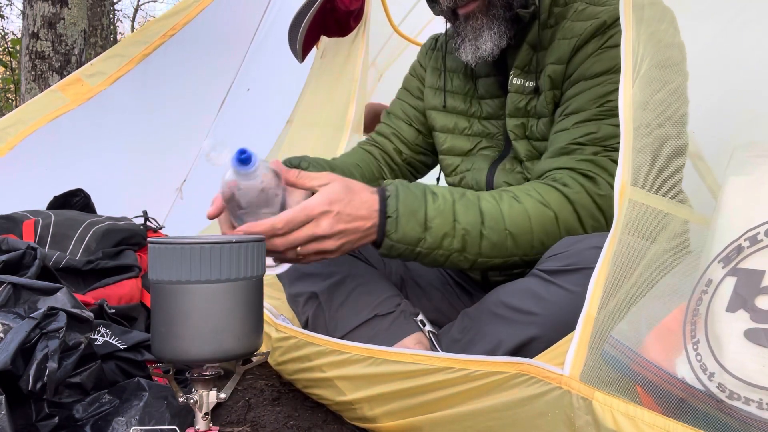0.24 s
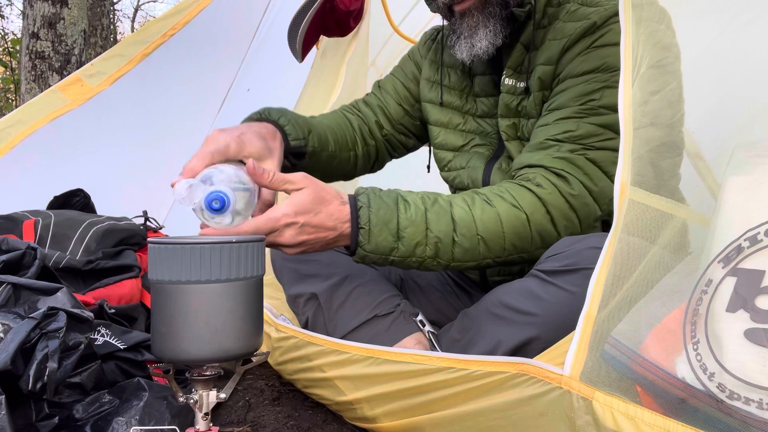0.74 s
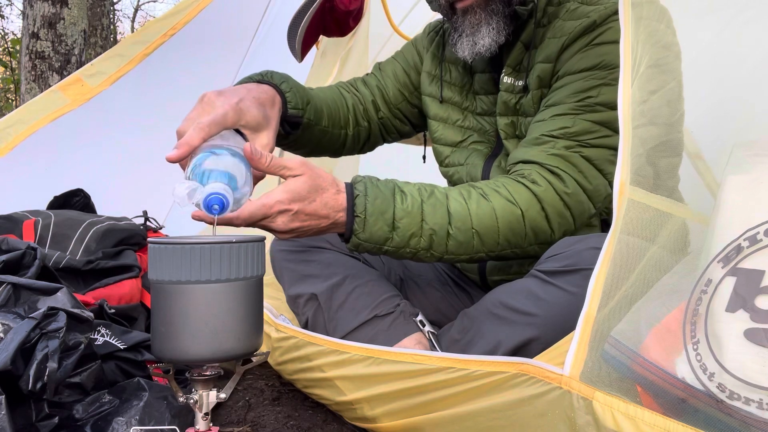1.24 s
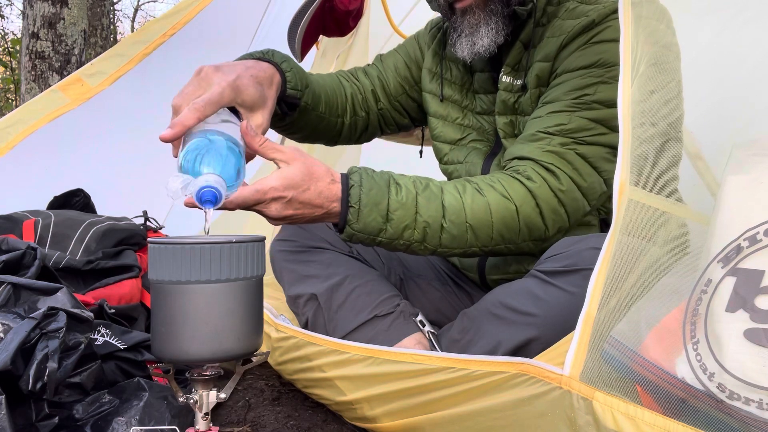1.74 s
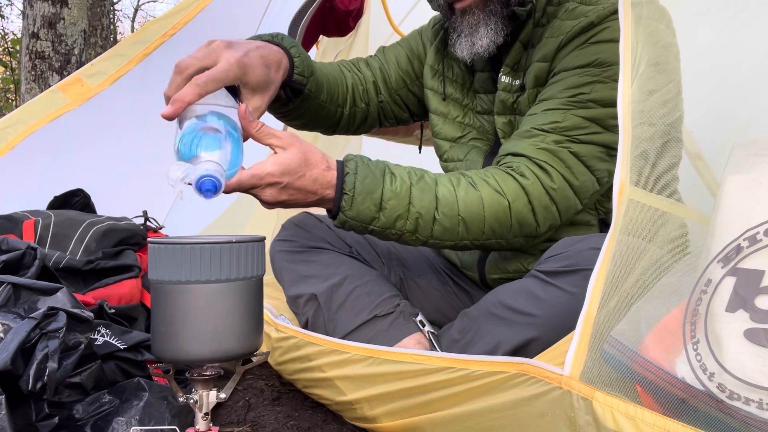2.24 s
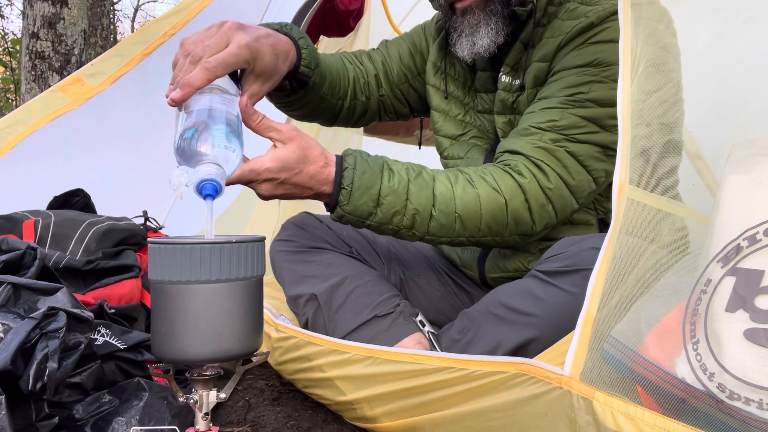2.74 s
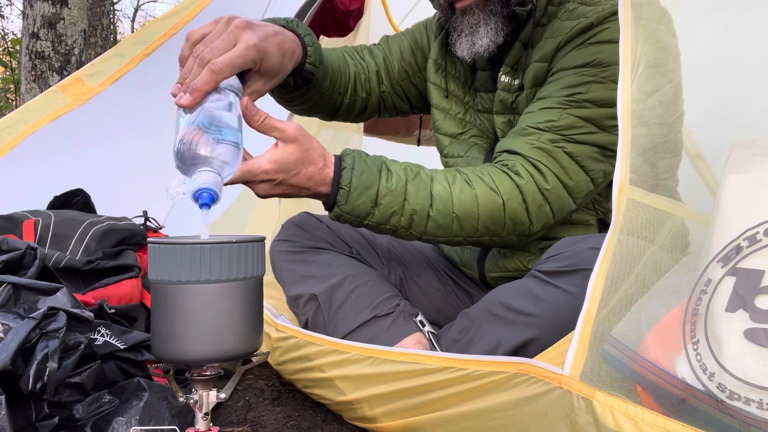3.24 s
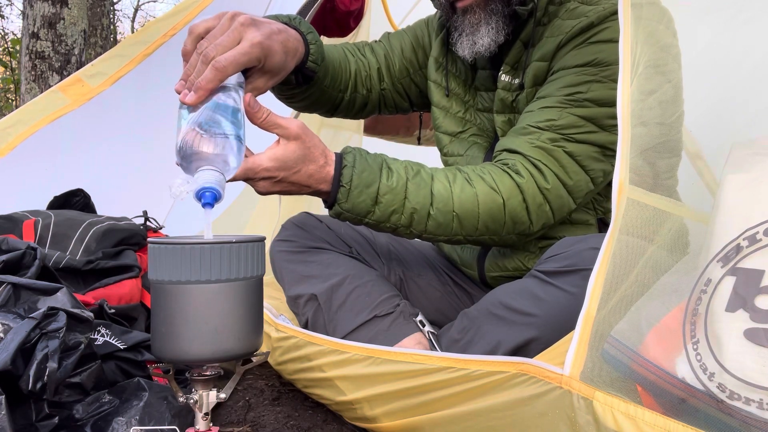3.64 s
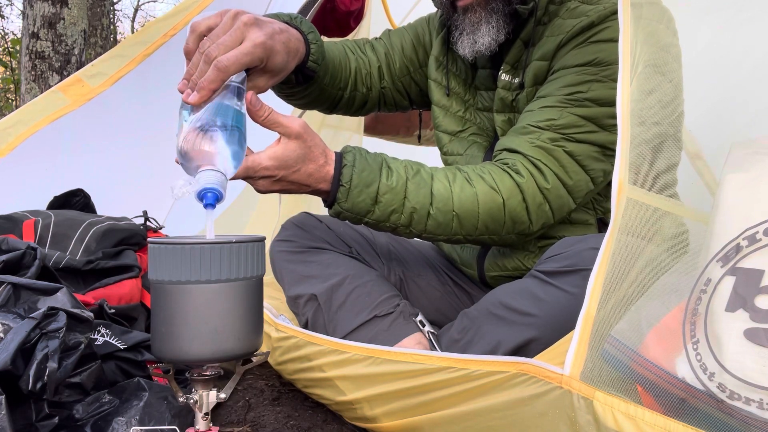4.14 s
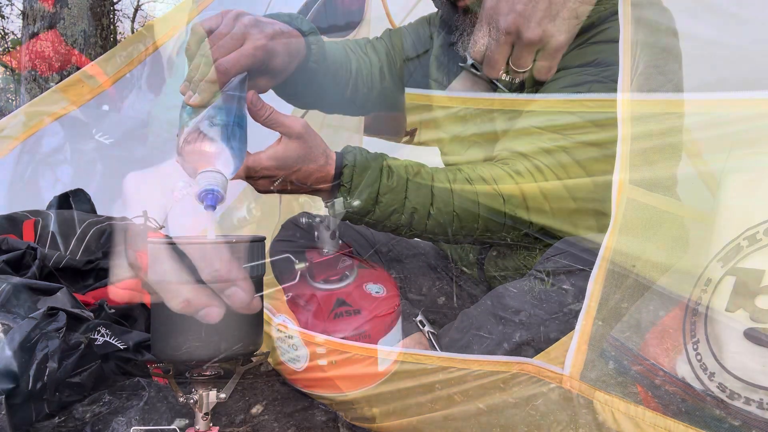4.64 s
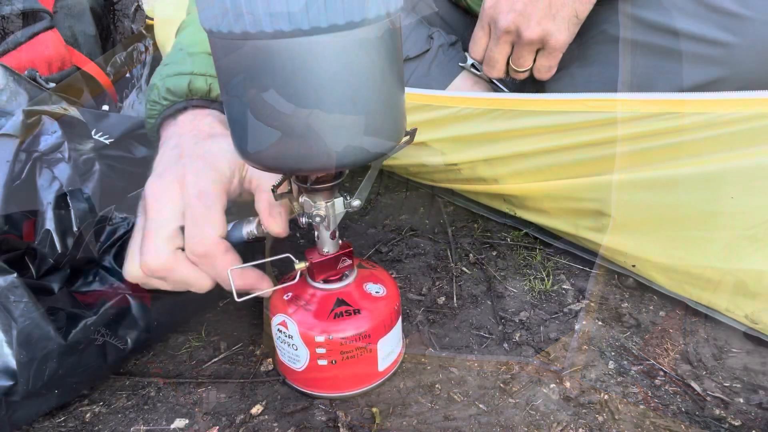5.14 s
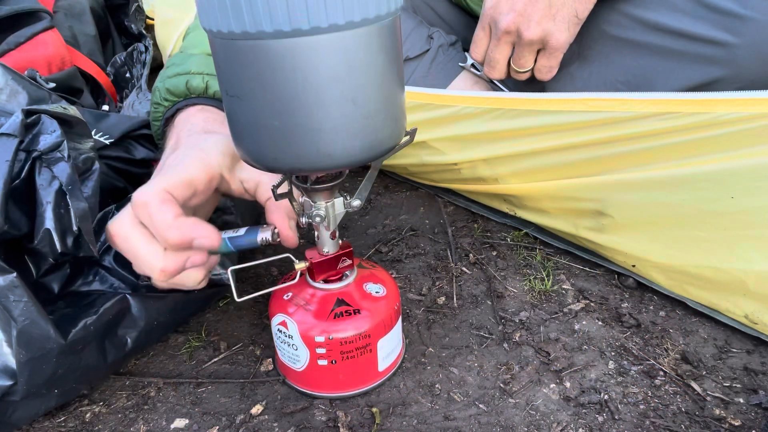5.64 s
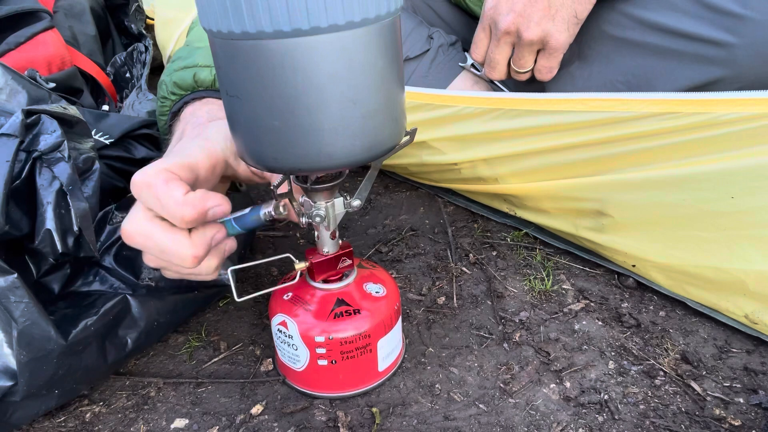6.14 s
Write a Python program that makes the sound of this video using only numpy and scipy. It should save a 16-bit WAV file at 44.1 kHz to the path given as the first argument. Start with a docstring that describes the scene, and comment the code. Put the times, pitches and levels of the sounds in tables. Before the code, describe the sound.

Water drips, glugs and then streams from a plastic bottle into an empty thin metal pot, pinging at first, splashier and fuller as it fills. Birds whistle with woodland echo behind a quiet outdoor hush. Pouring crossfades into the steady hiss of an opened gas stove, soft bumps of hands, and a single crisp lighter click without ignition. Close, natural stereo microphone.

```python
"""Water is poured from a plastic bottle into a thin metal pot, in an open tent in a wood.
Single drops ring wall and floor modes, the floor's sinking in pitch under the water; then a stream
splashes and gurgles, built from swarms of ringing bubbles, single large bubbles and noise slaps.
Pouring fades into the filtered-noise hiss of an opening gas stove; a lighter clicks once.
Behind are buzzed and slurred bird whistles with wood echo, sleeve rustle, knocks and outdoor hush."""
import sys
import numpy as np
from scipy import signal
from scipy.fft import rfft, irfft, next_fast_len
from scipy.io import wavfile
from scipy.ndimage import uniform_filter1d

SR = 44100
rng = np.random.default_rng(int(sys.argv[2]) if len(sys.argv) > 2 else 0)


def waveform_to_disk(signal):
    """Save audio, clipped to [-1, 1], as 16-bit WAV at the path in sys.argv[1]."""
    frames = np.transpose(np.atleast_2d(signal))
    scaled = np.clip(frames, -1, 1) * 32767
    samples = np.round(scaled).astype(np.int16)
    wavfile.write(sys.argv[1], SR, samples)


N = 281358
T = np.arange(N) / SR

# main mode of the pot floor, sinking under the water: [time_s, pitch_hz]
POT_PITCH = [(.9, 1173), (1.03, 1133), (1.5, 1086), (1.8, 1089), (1.97, 1125), (2.34, 1051), (2.42, 988),
             (2.86, 1049), (2.99, 1004), (3.17, 852), (3.48, 760), (3.65, 740), (3.9, 710), (4.2, 606),
             (4.9, 590)]
# strength of the stream, as the level of its splashing: [time_s, level_db]
FLOW = [(2.68, -95), (2.74, -68.5), (2.89, -54), (2.98, -51), (3.07, -55.5), (3.16, -48), (3.29, -52.5),
        (3.38, -50), (3.66, -47), (3.78, -47), (3.83, -49), (4.1, -45.5), (4.33, -47.5), (4.65, -46.5),
        (4.88, -48.5), (5.15, -60.5)]
# resonances of the air in the pot: [pitch_hz, width_hz, level_db]
CAVITY = [(453.5, 15, 5), (710, 90, -12), (1580, 110, -6.5), (2220, 140, 5.5), (2960, 300, 1),
          (6450, 250, 4), (8500, 620, -5.5)]
# the catch slips, then the hammer strikes: [start_s, relative_db, t60_s]
LIGHTER = [(5.682, -13, 0.014), (5.6832, -3, .0065)]
MAIN_HZ = 1083  # reference pitch of the main floor mode


def amp(db):
    """Decibels to gain."""
    return 10 ** (np.asarray(db) / 20)


def evened(x):
    """Scales to rms 1."""
    return x / np.sqrt(np.mean(x ** 2) + 1e-20)


def curve(rows, at, axis=1):
    """One column of a table, joined by straight lines."""
    rows = np.array(rows, float)
    return np.interp(at, rows[:, 0], rows[:, axis])


def colour(x, spectrum, modes=()):
    """Filters by a short spectrum on a log axis, with resonances standing out of it."""
    size = next_fast_len(len(x) + 2048)
    hz = np.fft.rfftfreq(size, 1 / SR)
    f, db = np.transpose(spectrum)
    peaks = 1 + sum(amp(g) / (1 + 2j * (hz - at) / width) for at, width, g in modes)
    gain = amp(np.interp(np.log(hz + 1), np.log(f), db))
    return irfft(rfft(x, size) * peaks * gain, size)[:len(x)]


def add(mix, s, sound):
    """Adds a sound at a time in seconds."""
    part = mix[max(round(s * SR), 0):][:len(sound)]
    part += sound[:len(part)]


def dying(t60, attack=.0004):
    """A quick rise and an exponential decay."""
    t = np.arange(int(1.3 * t60 * SR) + 2) / SR
    return (1 - np.exp(-t / attack)) * amp(-60 * t / t60)


def echoes(x, t60, build=0.0006):
    """Many scattered reflections, of energy 1 together."""
    fade = dying(t60, build)
    tail = rng.standard_normal(3 * SR)[:len(fade)] * fade
    return signal.oaconvolve(x, tail / np.linalg.norm(tail))[:len(x)]


def wander(rate):
    """Smooth chance of rms 1, with a new target rate times a second."""
    return evened(np.interp(T * rate, np.arange(N), rng.standard_normal(N)))


def glide(hz):
    """A sine that follows a pitch curve."""
    return np.sin(2 * np.pi * np.cumsum(hz) / SR)


def resonate(x, hz, width):
    """A resonance that follows a pitch curve: shift to zero, smooth, shift back."""
    turn = np.exp(2j * np.pi * np.cumsum(hz) / SR)
    r = np.exp(-np.pi * width / SR)
    return (turn * signal.lfilter([(1 - r) ** 2], [1, -2 * r, r * r], x / turn)).real


def steadied(x, seconds=0.038):
    """Evens out the slow level and keeps the grain."""
    power = abs(uniform_filter1d(x ** 2, int(seconds * SR)))
    return x / np.sqrt(power + 0.021 * np.mean(x ** 2))


def puffs(rows, steep_db):
    """Bursts of noise [start_s, level_db, centre_hz, t60_s], falling away on both sides of the centre."""
    out = np.zeros(N)
    for s, db, hz, t60 in rows:
        fade = dying(t60)
        slopes = [(hz / 8, -2 * steep_db), (hz / 2, -steep_db / 3), (hz, 0),
                  (hz * 2, -steep_db / 2), (hz * 8, -3 * steep_db)]
        noise = evened(colour(rng.standard_normal(SR // 2), slopes))
        add(out, s, amp(db) * noise[:len(fade)] * fade[:len(noise)])
    return out


def second_mode(main):
    """Pitch of the pot floor's second mode, which sinks faster than the main one."""
    return 1920 * (main / MAIN_HZ) ** 1.6


def pot(main_t60=0.36, second_t60=0.35, low_db=-20, swell=0.0017, ripple=0.01, churn=0.029,
        tick_db=-10, tick_t60=0.16):
    """Drops ring the wall at fixed modes and the floor at sinking ones; water on it makes all pitches waver."""
    # fixed modes of the pot wall: [pitch_hz, level_db, t60_s]
    wall = [(2196, -5, .16), (2940, -7, .18), (3600, -11, .1), (4050, -12, .07), (4484, -7, .13),
            (4888, -13, .08), (5240, -6, .075), (6304, -8, .1), (7300, -12, .07), (8280, -8, .1),
            (9351, -17, .08), (9884, -14, .08), (13270, -17, .05)]
    # a hard drop hits bare metal and rings the wall: [start_s, level_db, hardness_db,
    # favoured_hz (by the spot it hits), lift_db (there)]
    drops = [(0.872, -68, 0.5, 7950, 8), (0.905, -54.5, -22, 2200, 9), (0.939, -47.5, -43, 2200, 9),
             (.972, -51, -36, 2200, -3), (1.023, -50, -10, 2200, 7), (1.107, -47.5, -11, 5240, 19),
             (1.169, -65.5, 1, 5020, 15), (1.295, -78, 1.5, 5200, 22), (1.429, -61.5, -6.5, 5240, 13),
             (1.48, -69.5, -3, 5170, 17), (1.512, -68, -8, 5240, 16), (1.566, -59.5, 0, 7500, 7),
             (1.581, -71, 5.5, 2196, 1), (1.818, -71, 2, 6860, 8), (1.861, -75.5, 5.5, 8280, 12.5),
             (1.952, -62.5, -16, 8280, 12), (2.166, -61.5, 1.5, 7250, 9), (2.335, -58, 7.5, 8280, 9.5),
             (2.447, -76, 12.5, 4050, 17), (2.728, -82, 18, 4400, 14), (2.785, -73, -2, 2200, 17),
             (2.839, -58, -27, 4400, 10), (2.917, -50, -1, 3020, 10), (2.96, -46, -15, 4400, 19)]
    # splat of a drop: [pitch_hz, density_db (per Hz)]
    splat = [(1000, -3), (5000, 6), (14000, 10.5)]
    damping = 1.9  # the ring shortens as this power of the pitch as the water deepens
    second_db, second_share = -0.5, 0.39  # against the main mode; share of hardness it takes
    bright_db, bright_per_hard = 2.5, 0.55  # wall tilt, dB per octave; its rise per dB of hardness
    favour_octaves = 0.11  # reach of the lift around the favoured pitch

    flow = amp(curve(FLOW, T))
    out = np.zeros(N)
    ripples = 1 + (ripple + churn * flow / flow.max()) * wander(90)
    # sloshing water makes the floor's ring swell and dip
    slosh = amp(1.3 * wander(35))
    t = np.arange(int(.5 * SR)) / SR
    early = t[:SR // 5]
    hz, db, t60 = np.transpose(wall)[:, :, None]
    for s, level_db, hard_db, spot_hz, lift_db in drops:
        load = ripples[int(s * SR):][:len(t)]
        main = load * curve(POT_PITCH, s + t)
        second = second_mode(main)
        fall_db = 60 * t * (MAIN_HZ / main[0]) ** damping
        ring = amp(-fall_db / main_t60) * (glide(main) + amp(low_db) * glide(.475 * main))
        ring += amp(second_db + second_share * hard_db - fall_db / second_t60) * glide(second)
        rise = 1 - np.exp(-t / swell)
        add(out, s, amp(level_db) * ring * slosh[int(s * SR):][:len(t)] * rise)

        # each drop lands on another spot and favours other wall modes
        luck_db, detune = rng.normal(0, 2.5, hz.shape), rng.normal(1, .005, hz.shape)
        spot_db = lift_db * np.exp(-(np.log2(hz / spot_hz) / favour_octaves) ** 2)
        wall_db = level_db + hard_db
        tilt_db = (bright_db + bright_per_hard * hard_db) * np.log2(hz / 5000)
        level = amp(wall_db + db + tilt_db + spot_db + luck_db - 60 * early / t60)
        phase = 2 * np.pi * hz * detune * np.cumsum(load[:len(early)]) / SR
        add(out, s, (level * np.sin(phase)).sum(0))

        tick = dying(tick_t60)
        noise = colour(rng.standard_normal(SR // 4), splat)[:len(tick)]
        add(out, s, amp(wall_db + tick_db) * tick * noise)
    return out


def plops(swell=0.08):
    """A large trapped bubble swells, rings and slides in pitch as it nears the surface."""
    # large air bubbles: [start_s, level_db, start_hz, rise_octaves (per life)]
    large = [(0.703, -46.5, 1054, 0.67), (0.702, -49.5, 1574, 0.15), (2.167, -29.5, 1000, 0.62),
             (2.167, -46, 428, 1), (2.335, -49, 2920, -0.074), (2.182, -50, 216, -0.028),
             (2.4555, -51.5, 1680, 0.57), (2.461, -59, 2820, 0.37), (2.464, -57, 2200, -0.31),
             (2.629, -53, 190, -2.5), (2.785, -64, 2260, -0.33), (2.8, -46, 4880, -0.86),
             (2.812, -47, 4440, -0.85), (2.888, -51.5, 2980, 0.2), (2.917, -41.5, 3150, 0.49),
             (2.94, -47, 2940, 0.58), (2.96, -43, 1640, 0.22), (2.98, -41.5, 1670, 0.17),
             (2.985, -51, 2760, -1.9), (2.99, -44, 970, 0.38), (3.043, -47, 2980, -0.27),
             (3.112, -44.5, 2840, 0.033), (3.139, -40.5, 2330, 0.2), (3.095, -52.5, 800, -0.0065),
             (3.15, -50, 860, -0.15), (3.17, -58, 800, -.15), (3.235, -60, 810, -0.29),
             (3.177, -45, 2930, 0.5), (3.214, -37.5, 1520, -0.0039), (3.213, -40, 1760, -0.083),
             (3.217, -34, 2190, 0.25), (3.405, -50, 2230, 0.93), (3.462, -48, 750, -0.57),
             (3.48, -48, 790, -.05), (3.487, -47.5, 1270, -0.4), (3.544, -38.5, 4320, -0.49),
             (3.579, -40.5, 2810, 0.67), (3.618, -48, 1040, 0.018), (3.631, -46, 3020, -0.023),
             (3.718, -43.5, 4070, -0.7), (3.764, -46, 2190, -0.3), (3.864, -39, 3470, -0.34),
             (3.957, -38, 2170, -0.0066), (3.975, -47.5, 747, -0.023), (4.026, -42, 2180, 0.28),
             (4.048, -46.5, 750, 0.29), (4.115, -40.5, 2860, 0.21), (4.174, -39, 1200, 0.89),
             (4.176, -42, 753, -0.051), (4.189, -42.5, 1560, 0.52), (4.213, -43, 1844, -0.098),
             (4.236, -52, 514, -.8), (4.276, -43, 1155, 0.6), (4.364, -40, 1080, .1),
             (4.369, -44, 736, -0.044), (4.416, -43, 863, 0.87), (4.416, -40, 3170, 0.47),
             (4.442, -38.5, 694, 0.52), (4.452, -41, 3020, -0.063), (4.475, -40, 3200, -0.99),
             (4.517, -57, 600, 0), (4.545, -45, 735, 1), (4.563, -51.5, 417, -1.4),
             (4.628, -34, 3480, -0.6), (4.669, -48, 780, -0.54), (4.697, -48, 700, 0.92),
             (4.733, -37.5, 1550, -0.27), (4.748, -39, 2820, 1)]
    life_1khz_s, life_slope = 0.036, 0.25  # larger, lower bubbles last longer by this power
    out = np.zeros(N)
    for s, db, hz, rise in large:
        life = life_1khz_s * (1000 / hz) ** life_slope
        u = np.arange(int(1.5 * life * SR)) / (life * SR)
        envelope = u / swell * np.exp(1 - u / swell)
        add(out, s, amp(db) * envelope * glide(hz * 2 ** (rise * u)))
    return out


def slaps():
    """The loudest slaps of water, snaps of the bottle and a few rustle ticks, as short noise bursts."""
    # [start_s, level_db, centre_hz, t60_s]
    bursts = [(0.044, -45.5, 7000, 0.023), (.098, -57, 1880, 0.034), (.208, -56.5, 1500, 0.019),
              (0.704, -47.5, 1600, 0.017), (.704, -43.5, 9500, 0.022), (1.861, -58, 6500, 0.021),
              (2.167, -45, 1460, 0.015), (2.167, -53, 11100, 0.009), (2.334, -49, 11500, 0.017),
              (2.362, -53, 8100, 0.027), (2.389, -50, 3720, 0.014), (2.39, -46, 8300, .025),
              (2.398, -48.5, 6700, 0.065), (2.632, -58.5, 7400, 0.036), (2.785, -61, 4700, 0.14),
              (2.839, -43, 8800, 0.017), (2.917, -43, 2560, 0.014), (2.96, -36, 1900, 0.018),
              (3.087, -39, 5300, 0.0084), (3.11, -35.5, 6440, 0.026), (3.149, -45, 4650, .015),
              (3.161, -38, 5230, 0.046), (3.3305, -37, 7700, 0.018), (3.501, -41.5, 2270, 0.023),
              (3.543, -38, 6000, 0.017), (3.605, -33.5, 6200, 0.013), (3.719, -37.5, 4260, 0.036),
              (3.722, -37, 6670, 0.019), (3.764, -35, 8300, 0.018), (3.802, -36.5, 1690, 0.019),
              (3.807, -37, 8500, 0.026), (3.857, -39.5, 3600, 0.028), (3.957, -39, 3000, 0.032),
              (4.028, -45, 4600, 0.018), (4.088, -35.5, 6680, 0.018), (4.167, -22.5, 5800, 0.0096),
              (4.259, -31, 8400, 0.016), (4.299, -33.5, 6500, 0.024), (4.358, -27.5, 7560, 0.014),
              (4.369, -28.5, 5930, 0.031), (4.409, -32.5, 6200, 0.015), (4.469, -26.5, 5400, 0.0074),
              (4.475, -30, 3970, 0.013), (4.67, -28.5, 3380, 0.019), (4.7335, -27, 2380, 0.0083),
              (4.789, -31, 6040, .018)]
    return puffs(bursts, steep_db=24.5)


def bubbles(low_hz, high_hz, cycles, spread_db, clump_db, rise, count):
    """A swarm of small ringing bubbles, born in clumps as the stream breaks up."""
    when, pitch, size, damping = rng.random((count, 4)).T
    start, end = FLOW[0][0], FLOW[-1][0]
    at = ((start + when * (end - start)) * SR).astype(int)
    hz = low_hz * (min(high_hz, SR / 2.6) / low_hz) ** np.sqrt(pitch)
    life = cycles * (.5 + damping) / hz
    size_db = spread_db * np.minimum(-np.log(1 - size), 3.5)
    height = amp(size_db + clump_db * wander(55)[at]) / np.sqrt(life)
    # all bubbles laid end to end: owner, age in samples, share of life
    lengths = (life * SR).astype(int)
    which = np.repeat(np.arange(count), lengths)
    age = np.arange(len(which)) - (np.cumsum(lengths) - lengths)[which]
    u = age / lengths[which]
    grains = height[which] * np.exp(-np.log(1000) * u) * (1 - np.exp(-30 * u))
    grains *= np.sin(2 * np.pi * (hz * life)[which] * u * (1 + rise * u))
    return evened(np.bincount(at[which] + age, grains, N)[:N])


def sinking(drive, main_db=-14, second_db=-18, width_hz=130, drowned_db=28):
    """The stream rings the two floor modes in fits as they sink; the main one drowns, dB per octave."""
    main = curve(POT_PITCH, T) * (1 + .04 * wander(18))
    fits = evened(amp(6 * wander(28)))
    sunk_db = main_db + drowned_db * np.log2(main / MAIN_HZ)
    low = amp(sunk_db) * steadied(resonate(drive, main, width_hz))
    high = amp(second_db) * steadied(resonate(drive, second_mode(main), width_hz))
    return fits * (low + high)


def gurgle(deep):
    """Deep bubbles, and the hollow note they keep sounding, which sinks as the pot fills."""
    # [pitch_hz, density_db (per Hz)]
    gurgle_spectrum = [(150, -14), (300, 4.5), (450, -2.5), (730, 5), (1200, 1.5), (1700, -31), (2600, -27)]
    # hollow note: [time_s, pitch_hz]
    gulp_pitch = [(3, 906), (3.5, 760), (4, 745), (4.5, 714), (4.9, 722)]
    gulp_width_hz, gulp_waver, gulp_db = 90, 0.05, -7.5
    note_hz = curve(gulp_pitch, T) * (1 + gulp_waver * wander(15))
    note = resonate(deep, note_hz, gulp_width_hz)
    body = steadied(colour(deep, gurgle_spectrum, CAVITY))
    return steadied(body + amp(gulp_db) * steadied(note))


def drone(drive):
    """The patter of the stream keeps low modes of the air in the pot humming."""
    # [pitch_hz, t60_s, relative_db]
    low_modes = [(443.4, 0.58, -3), (532, 0.15, -6.5)]
    t = np.arange(SR // 3) / SR
    total = np.zeros(N)
    for hz, t60, db in low_modes:
        ring = amp(-60 * t / t60) * np.sin(2 * np.pi * hz * t)
        total += amp(db) * steadied(signal.oaconvolve(drive, ring)[:N])
    return total


def stream(wet_db=-6, spray_db=-1, ringing_db=-2):
    """Fine spray, ringing bubbles and gurgling coloured by the pot's air, with floor ring and hum."""
    # [pitch_hz, density_db (per Hz)]
    splash_spectrum = [(300, -7), (700, -7.5), (1200, -2), (2200, -7.5), (2600, -10), (3100, -4),
                       (5500, -6), (6500, -9.5), (9000, -2.5), (11000, 1.5), (13000, -8.5), (15500, 1.5)]
    # depth of plunge, as gurgle against splash: [time_s, relative_db]
    plunge = [(2.97, -28), (3.14, -7.5), (3.3, -21.5), (3.5, -21), (3.92, -25.5), (4.17, -3.5), (4.9, -7)]
    # low hum: [time_s, level_db]
    hum = [(2.8, -89), (2.93, -71.5), (3.25, -69), (3.4, -93), (3.95, -83), (4.2, -62), (4.45, -67),
           (4.8, -78), (5.1, -98)]
    spray = bubbles(1015, 15550, cycles=11.5, spread_db=3.0, clump_db=4.0, rise=0.093, count=7000)
    ringing = bubbles(900, 8000, cycles=55, spread_db=2.7, clump_db=2, rise=.04, count=3600)
    deep = bubbles(350, 1900, cycles=26, spread_db=2.8, clump_db=2, rise=.04, count=1600)
    splash = amp(spray_db) * spray + amp(ringing_db) * ringing
    wet = splash + amp(wet_db) * echoes(splash, 0.022)
    surface = steadied(colour(wet, splash_spectrum, CAVITY)) + sinking(spray + deep)
    poured = surface + amp(curve(plunge, T)) * gurgle(deep)
    return amp(curve(FLOW, T)) * poured + amp(curve(hum, T)) * drone(deep)


def gas(flutter_db=0.44):
    """The unlit jet hisses, with narrow peaks standing out of it: it swells, then sags and dulls."""
    # jet noise: [pitch_hz, density_db (per Hz)]
    jet = [(200, -30), (600, -27.5), (950, -15.5), (1550, -13.5), (1950, -17), (2800, -8.5), (3200, -8),
           (3950, -0.5), (4600, -7), (5350, -1.5), (6000, -14), (8500, -17.5), (11000, -17.5), (12500, -27),
           (15000, -16)]
    # narrow peaks standing out of the hiss: [pitch_hz, width_hz, level_db]
    jet_peaks = [(3182, 50, 4.5), (3363, 125, 5), (3670, 170, -3.5), (3974, 97, 2), (4760, 190, -2.5),
                 (5300, 62, 2.5), (14300, 170, -19)]
    # change of colour once the valve is eased back: [pitch_hz, gain_db]
    jet_eased = [(1000, 0), (3500, 0.5), (4800, -4), (6200, -2.5), (9000, -0.5), (15000, -0.5)]
    start_s, rise_s, rise_power, level_db = 4.37, 0.8, 0.63, -36.5
    sag_from_s, sag_db_per_s = 5.2, 4  # the valve is eased back
    surge_db, surge_s = 1, 0.21  # extra strength around the start of easing

    hiss = evened(colour(rng.standard_normal(N), jet, jet_peaks))
    eased = np.clip((T - sag_from_s) / rise_s, 0, 1)
    hiss = (1 - eased) * hiss + eased * colour(hiss, jet_eased)
    opening = np.clip((T - start_s) / rise_s, 0, 1) ** rise_power
    swell_db = surge_db * np.exp(-((T - sag_from_s) / surge_s) ** 2)
    sag_db = sag_db_per_s * np.maximum(T - sag_from_s, 0)
    return hiss * opening * amp(level_db + swell_db - sag_db + flutter_db * wander(25))


def lighter(scrape_db=-27, scrape=0.0077, ring_db=-27, ring_t60=0.064):
    """The trigger scrapes for an instant, then the spring hammer snaps and the case rings."""
    # [pitch_hz, density_db (per Hz)]
    snap = [(200, -19.5), (1000, -32), (2000, -17.5), (3300, -9), (5500, -9.5), (8000, -9.5), (11000, -8.5),
            (13000, -4.5), (15000, -5)]
    slip = LIGHTER[0][0]
    out = amp(scrape_db) * np.exp(-abs(T - slip) / scrape) * (T < slip)
    for s, db, t60 in LIGHTER:
        add(out, s, amp(db) * dying(t60, attack=0.0032) * 2)
        add(out, s, amp(db + ring_db) * dying(ring_t60))
    return out * evened(colour(rng.standard_normal(N), snap))


def handling():
    """Dull noise bursts: hands knock bottle, stove and ground, and thud under the lighter's snap."""
    # [start_s, level_db, centre_hz, t60_s]
    dull_knocks = [(0.015, -65, 135, 0.22), (.07, -64, 130, 0.086), (.27, -61, 370, .08),
                   (.705, -47, 373, 0.045), (2.183, -51, 260, 0.1), (2.63, -64, 260, 0.049),
                   (2.645, -58, 95, 0.069), (4.743, -44, 200, 0.08), (4.784, -53.5, 118, 0.27),
                   (4.879, -43, 453, 0.092), (4.895, -49, 199, 0.12), (5.29, -54.5, 322, 0.32),
                   (5.347, -52, 270, 0.13), (5.622, -48, 704, 0.13)]
    # hand and stove under the snap, low parts last: [lag_s, level_db, centre_hz, t60_s]
    thud = [(.002, -35.5, 610, 0.037), (.006, -40, 237, 0.055), (0.011, -39.5, 82, 0.12)]
    snap_s = LIGHTER[0][0]
    thuds = [(snap_s + lag, db, hz, t60) for lag, db, hz, t60 in thud]
    return puffs(dull_knocks, steep_db=13.5) + puffs(thuds, steep_db=9.5)


def sleeve(catch_db=2.0):
    """Padded nylon slides and catches in quick surges as the bottle is lifted; each stroke swells and dies."""
    # strokes: [peak_s, level_db (before the surges), rise_s, fade_s]
    stroke_rows = [(.1, -57.5, 1, 0.15), (.7, -54, 0.019, 0.04), (0.918, -60.5, 0.059, 0.13)]
    # [pitch_hz, density_db (per Hz)]
    nylon = [(100, 5), (400, -9.5), (1300, -2.5), (3000, -3), (5000, 11), (8000, -4.5), (11000, -10),
             (15000, -11)]
    strokes = np.zeros(N)
    for s, db, rise, fade in stroke_rows:
        strokes += amp(db) * np.exp(-np.maximum((s - T) / rise, (T - s) / fade))
    return evened(colour(rng.standard_normal(N), nylon)) * strokes * amp(catch_db * wander(110))


def bird(near_db=-3, echo_db=-1, wood_t60=0.86, waver=0.0163, build=0.0063):
    """Buzzed notes and slurred whistles as gliding sines, with their echo among the trees."""
    # nearer bird: [start_s, length_s, pitch_hz, note_db, fall_octaves (at the end)]
    buzzes = [(-.17, 0.14, 5380, -52.5, 0.41), (0.01, 0.23, 5430, -56, 0.017),
              (0.194, 0.11, 5506, -48.5, 0.49), (0.379, .21, 6126, -48.5, 0.83),
              (0.64, 0.21, 6216, -50, 0.051)]
    # farther off: [start_s, length_s, start_hz, note_db, glide_octaves, direct_db (against the note)]
    slurs = [(1.028, 0.082, 2186, -57, 0.71, -13.5), (1.086, 0.024, 3020, -53.5, 0.56, -16),
             (1.201, 0.073, 2324, -55.5, 0.73, -12), (1.249, 0.05, 3124, -60.5, 0.48, -24),
             (1.261, 0.16, 6000, -75, 0.32, -8), (1.58, 0.092, 6080, -77.5, 0.15, -3.5),
             (1.939, 0.1, 5390, -69, -1.3, -16), (2.035, 0.14, 4610, -66.5, -1.13, -35),
             (2.1, 0.81, 6070, -80, -0.025, -5)]
    buzz_per_s, buzz_depth, buzz_pulse = 190, 0.073, 0.21  # trill in pitch and in loudness
    scoop_octaves, scoop_s, flick_s = 0.1006, 0.02037, 0.055  # scoop up at start, flick down at end
    # a second of lead-in holds notes that begin before time zero
    direct, sung = np.zeros((2, N + SR))
    unsteady = 1 + waver * wander(400)

    def sing(s, db, hz, direct_db, trill=1):
        """One whistle with soft ends and an unsteady pitch."""
        envelope = amp(db) * np.sqrt(2) * signal.windows.tukey(len(hz), .2) * trill
        note = envelope * glide(hz * np.roll(unsteady, -int(s * SR))[:len(hz)])
        add(sung, s + 1, note)
        add(direct, s + 1, amp(direct_db) * note)

    for s, length, hz, db, fall in buzzes:
        t = np.arange(int(length * SR)) / SR
        flick = np.clip(1 - (length - t) / flick_s, 0, 1)
        trill = (1 - flick) * np.sin(2 * np.pi * buzz_per_s * t)
        bend_octaves = -scoop_octaves * np.exp(-t / scoop_s) - fall * flick
        pitch = hz * (1 + buzz_depth * trill) * 2 ** bend_octaves
        sing(s, db, pitch, near_db, 1 + buzz_pulse * trill)
    for s, length, hz, db, octaves, direct_db in slurs:
        sing(s, db, hz * 2 ** np.linspace(0, octaves, int(length * SR)), direct_db)
    sides = [direct + amp(echo_db) * echoes(sung, wood_t60, build) for side in range(2)]
    return np.array(sides)[:, SR:]


def hush(level_db=-72, swell_db=0.85):
    """Quiet outdoor air, gently swelling, alike at both ports in the bass."""
    # [pitch_hz, density_db (per Hz)]
    air = [(20, -14), (35, -2.5), (55, 6.5), (95, 3.5), (160, -9), (500, -16.5), (1500, -21), (3000, -19),
           (4800, -24), (6200, -21), (7500, -25), (15000, -48)]
    # side against middle: [pitch_hz, gain_db]
    apart = [(60, -12), (150, 0.5), (400, 0), (3000, -1.5)]
    mid, side = (evened(colour(rng.standard_normal(N), air)) for k in range(2))
    side = colour(side, apart)
    return amp(level_db + swell_db * wander(2.3)) * np.array([mid + side, mid - side])


def ports(x, scattered, place):
    """Each port hears direct sound at its own phase and level; scattered sound sets the two apart."""
    # the ports' own treble colour, the same for every place: [pitch_hz, left_lead_rad, likeness_0_to_1]
    port_treble = [(6800, 0.27, 0.8), (8800, 1.15, 0.73), (10070, 2.17, 0.79), (10470, 3.184, 1),
                   (11820, 3.24, 1), (12830, 5.84, 1), (15700, 15, 1)]
    size = next_fast_len(N + 2048)
    hz = np.fft.rfftfreq(size, 1 / SR)
    place = place + [(*row, 0) for row in port_treble]
    same = np.clip(curve(place, hz, axis=2), 0, 1)
    # half of the lead and level goes to each side
    lead = np.exp(.5j * curve(place, hz)) * amp(curve(place, hz, axis=3) / 2)
    direct = rfft(x, size) * np.sqrt((1 + same) / 2)
    stray = rfft(scattered, size) * np.sqrt((1 - same) / 2)
    return irfft(np.array([(direct + stray) * lead, (direct - stray) / lead]), size)[:, :N]


def scene(tent_db=-18, tent_t60=0.12):
    """Water at the pot, gas and lighter at the stove, the wood behind."""
    # how the two microphone ports hear a place:
    # [pitch_hz, left_lead_rad, likeness_0_to_1, left_over_right_db]
    at_pot = [(100, -0.5, 0.86, -1), (400, 0.76, 1, -2), (650, 1.13, 1, 2), (1100, -1, 1, 2.2),
              (1670, .5, 1, -1.5), (2460, 1.0, 0.96, -1.5), (3200, -0.5, 0.62, -1), (5080, 2, 0.18, -0.5),
              (6200, 0.67, 1, 1)]
    at_stove = [(102, 0.5, 0.56, -3), (396, -0.9, .35, 1.5), (650, -1, 0.69, -2), (1240, 1.06, 1, -2.5),
                (1810, -1.4, 0.97, 1), (2770, -2, 0.55, -2), (3270, -1.32, 0.88, -.5), (5230, -2, 0.91, -2),
                (5900, -2.5, 1, -3)]
    water = pot() + plops() + slaps() + stream()
    water = water + amp(tent_db) * echoes(water, tent_t60)
    # the heaving surface keeps changing the reflections inside the pot
    turn = np.pi * wander(10)
    inside = np.cos(turn) * echoes(water, 0.023) + np.sin(turn) * echoes(water, 0.0069)
    pouring = ports(water + sleeve(), inside + sleeve(), at_pot)
    knocks, click = handling(), lighter()
    scattered = gas() + echoes(knocks, 0.021) + echoes(click, 0.015)
    stove = ports(gas() + knocks + click, scattered, at_stove)
    return pouring + stove + bird() + hush()


def record(dry, low_cut_hz=42, edge_hz=15900):
    """The microphone's low cut and the band limit."""
    dry = signal.sosfilt(signal.butter(2, low_cut_hz, "high", fs=SR, output="sos"), dry)
    band = signal.firwin(401, edge_hz, window=("kaiser", 8), fs=SR)
    return signal.oaconvolve(dry, band[None], "same")


dry = scene()
out = record(dry)
waveform_to_disk(out)
```